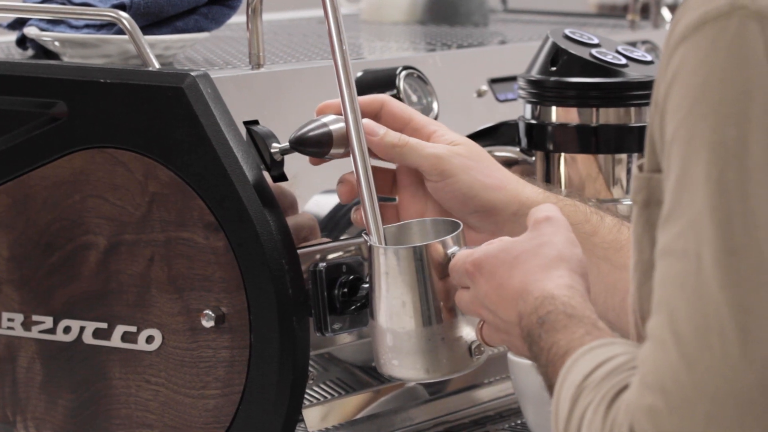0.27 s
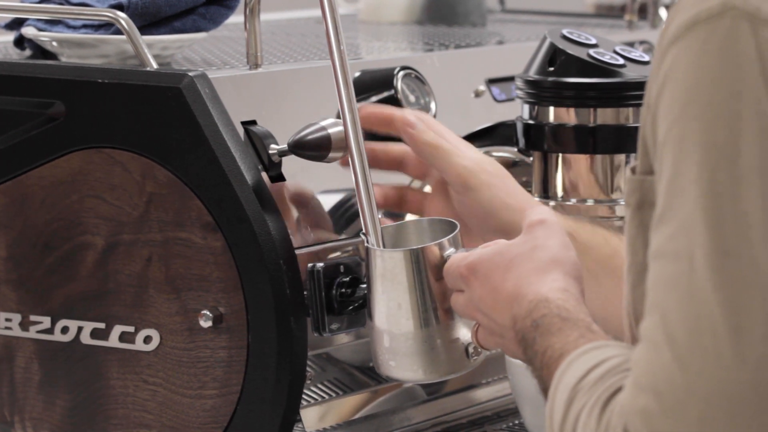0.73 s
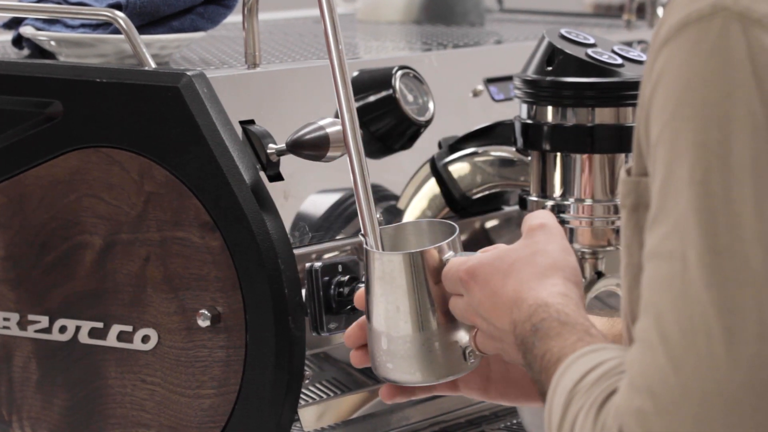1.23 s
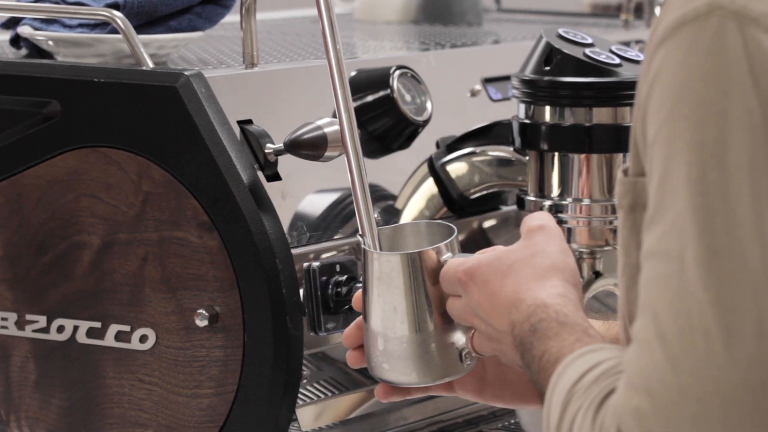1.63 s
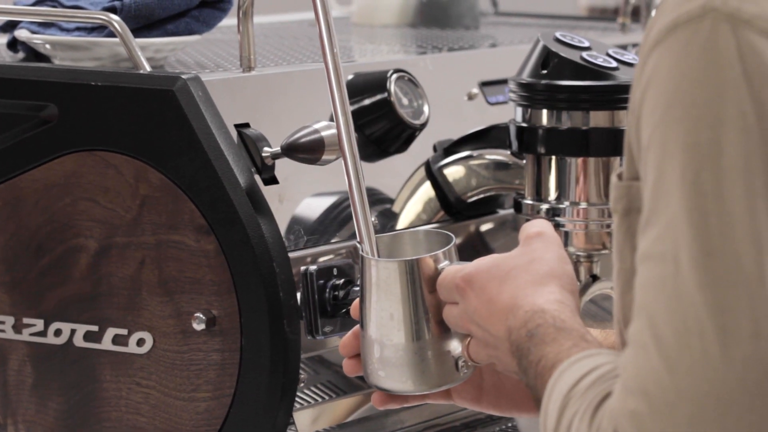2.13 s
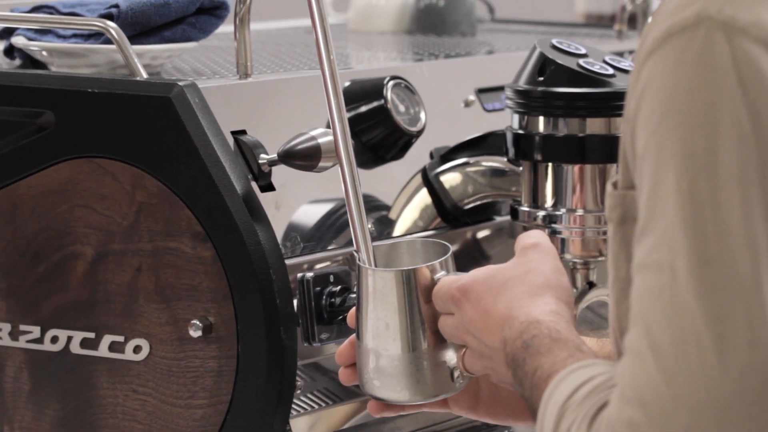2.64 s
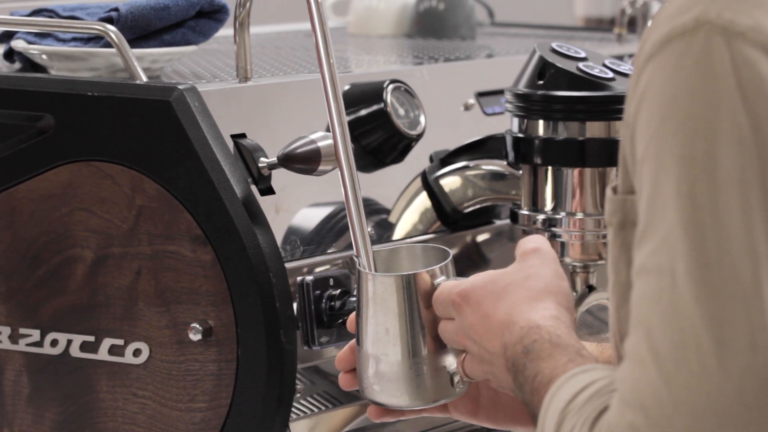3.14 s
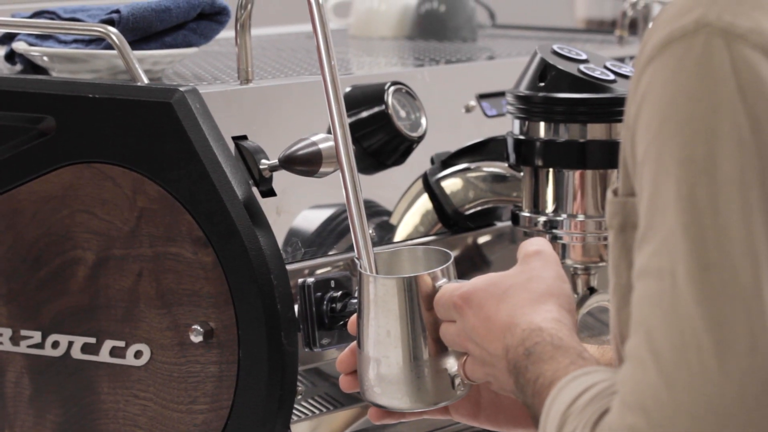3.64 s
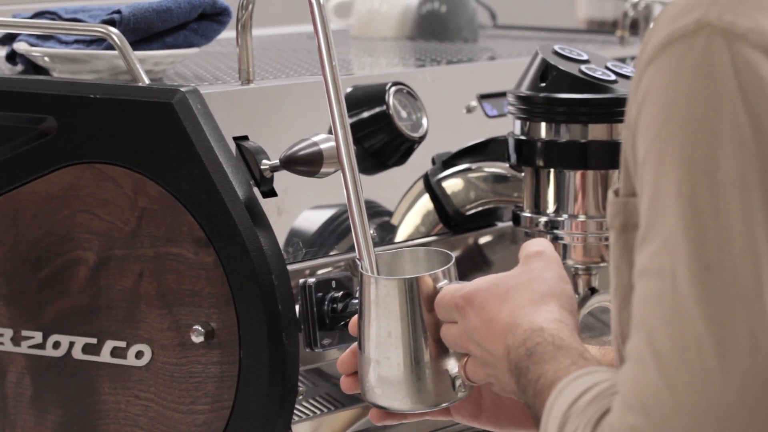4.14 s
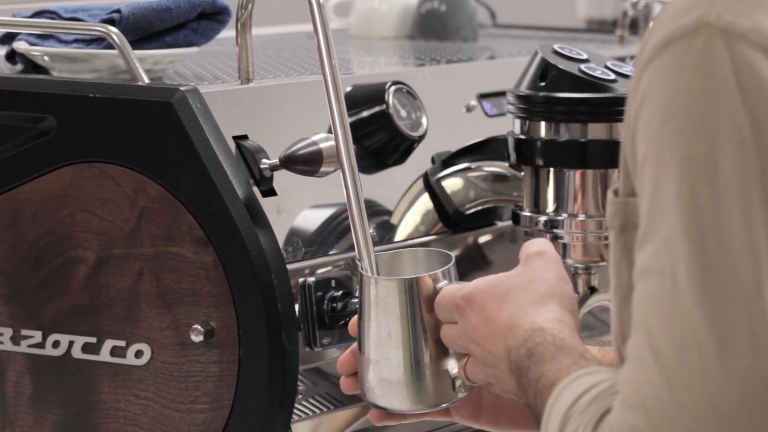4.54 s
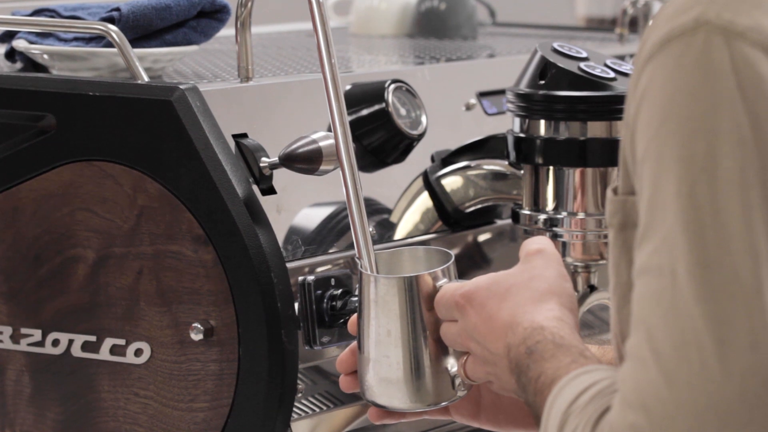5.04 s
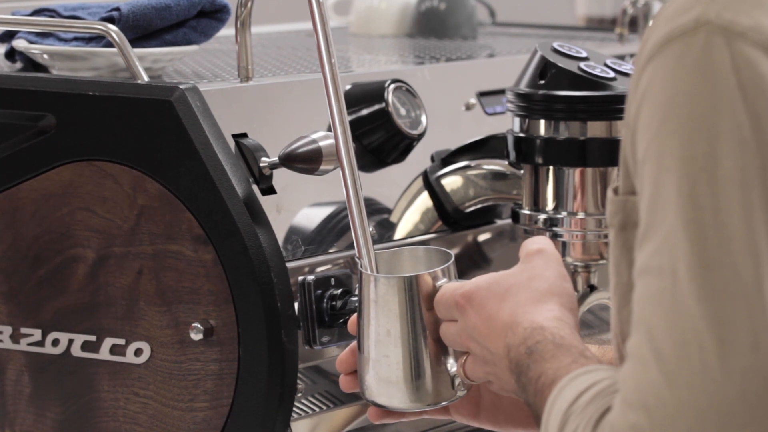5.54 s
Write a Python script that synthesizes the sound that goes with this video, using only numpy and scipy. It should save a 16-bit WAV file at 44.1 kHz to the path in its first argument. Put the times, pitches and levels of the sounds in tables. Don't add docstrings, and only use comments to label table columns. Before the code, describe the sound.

Close view of milk being steamed in a steel pitcher in a quiet room. A loud, shrill metallic screech with roaring steam opens, fades within about a second, then a quieter hollow hiss remains. Small bubbles pop, and from the middle onward bright crackling spits and sputters break through, while the hiss grows duller. Very faint machine rumble lies beneath.

```python
import sys
import numpy as np
from scipy import signal
from scipy.fft import rfft, irfft, next_fast_len
from scipy.io import wavfile
from scipy.ndimage import uniform_filter1d

SR = 44100
rng = np.random.default_rng(int(sys.argv[2]) if len(sys.argv) > 2 else 0)


def nominal_scale(level):
    x = np.asarray(level, float) / 20
    return 10 ** x


def wrap_up_sound(samples):
    columns = np.atleast_2d(samples).T
    tamed = np.clip(columns, -1, 1)
    steps = np.round(tamed * 32767).astype(np.int16)
    wavfile.write(sys.argv[1], SR, steps)


N = 255339
TIME = np.arange(N) / SR
SIZE = next_fast_len(N)
HZ = np.maximum(np.arange(SIZE // 2 + 1) * SR / SIZE, 1)


def rms_one(x):
    return x / np.sqrt(np.mean(x ** 2) + 1e-20)


def in_time(rows):
    s, *columns = np.transpose(rows)
    return [np.interp(TIME, s, column) for column in columns]


def at_hz(points, hz):
    point_hz, point_db = np.transpose(points)
    return np.interp(np.log(hz), np.log(point_hz), point_db)


def drift(rate):
    step = 16
    r = np.exp(-2 * np.pi * step * rate / SR)
    slow = signal.lfilter([1], [1, -2 * r, r * r], rng.standard_normal(N // step + 3002))[3000:]
    return np.interp(np.arange(N) / step, np.arange(len(slow)), rms_one(slow))


def resonance(x, hz, width):
    hz = hz + np.zeros(N)
    out, state = np.zeros(N), np.zeros(2)
    r = np.exp(-np.pi * width / SR)
    b = [(1 - r * r) / 2, 0, (r * r - 1) / 2]
    size = 256 if np.ptp(hz) else N
    for i in range(0, N, size):
        a = [1, -2 * r * np.cos(2 * np.pi * hz[i] / SR), r * r]
        out[i:i + size], state = signal.lfilter(b, a, x[i:i + size], zi=state)
    return out


def mode(x, hz, width):
    return rms_one(resonance(resonance(x, hz, width), hz, 3 * width))


def churn(rough_db, rate):
    return rms_one(rng.standard_normal(N) * nominal_scale(rough_db * drift(rate)))


# (frequency [Hz], width [Hz], lift [dB])
HIGH_AIR = [(6760, 220, 8.5), (8210, 540, 6), (9900, 1630, 4), (7500, 270, 6), (4500, 380, 0.5),
            (12250, 660, 3), (14600, 600, 2.5), (5700, 520, 3.5), (2410, 1200, 7)]


def bands(source, patchy_db, rate):
    lift_db = sum(db / (1 + (2 * (HZ - hz) / width) ** 2) for hz, width, db in HIGH_AIR)
    spectrum = rfft(source, SIZE) * nominal_scale(lift_db)
    for centre in 400 * 2 ** (np.arange(28) / 5):
        band_shape = np.cos(np.pi / 2 * np.clip(5 * np.log2(HZ / centre), -1, 1)) ** 2
        yield centre, irfft(spectrum * band_shape, SIZE)[:N] * nominal_scale(patchy_db * drift(rate))


# (frequency [Hz], density [dB per Hz])
ROOM = [(12, -49), (20, -18.5), (140, -7), (169, -3), (195, -8.5), (260, -5), (447, -15.5), (720, -43),
        (900, -29.5), (1170, -48), (1980, -120)]
# (frequency [Hz], level [dB])
HUM = [(705, -70), (405, -73), (39, -85), (165, -76)]


def room():
    rumble = irfft(rfft(rng.standard_normal(N), SIZE) * nominal_scale(at_hz(ROOM, HZ)), SIZE)[:N]
    tones = sum(nominal_scale(db) * rms_one(resonance(rng.standard_normal(N), hz, 2.1)) for hz, db in HUM)
    return nominal_scale(-68) * rms_one(rumble) + tones


# (time [s], violence [dB], tightness of the jet [rim pitch ratio])
COLLAPSE = [
    (0, 2, 0.5),
    (0.081, 1.5, .63),
    (.14, -1, 0.84),
    (0.229, 1, 0.96),
    (.5, -2.5, 0.99),
    (.82, -4.5, 1.05),
    (.93, -7, .97),
    (.99, -17, .88),
    (1.15, -23, 0.75),
]
# (frequency [Hz], density [dB per Hz])
SCREECH_COLOUR = [(300, -38), (500, -28.5), (800, -10.5), (1000, -34), (1500, 6), (2500, -15), (3300, -9),
                  (4400, 0.5), (5500, -12.5), (6900, -22), (7900, -11), (10500, -11), (12000, -12.5),
                  (16000, -22)]
# (frequency [Hz], width [Hz], level [dB])
WALL = [(988, 38.5, 0), (1245, 29, -8), (428, 48, -28.5), (3050, 61, -29)]
# (frequency [Hz], width [Hz], level [dB])
RIM = [(1823, 28, 1.5), (1970, 26, -2.5), (2150, 50, -2.5), (1687, 60, -7)]
# (frequency [Hz], width [Hz], level [dB])
BRIGHT = [(4840, 450, -4), (7730, 110, -7.5), (8010, 220, -10.5), (9060, 180, -14.5), (6630, 80, -32)]


def screech():
    violence_db, tight = in_time(COLLAPSE)
    tight = np.minimum(tight, 1)
    end_s = COLLAPSE[-1][0]
    t = np.minimum(TIME, end_s)
    alive = t < end_s
    wall_db = -25 + 1.9 * violence_db - 12 * np.clip((t - 0.81) / 0.024, 0, 1)
    rim_db = -23.5 + 1.44 * violence_db + 14.5 * t
    roar_db = -26 + 0.87 * violence_db
    whistle_db = -19.5 + violence_db - 55 * (1 - tight)
    whistle_hz = (3960 - 500 * t) * tight ** 0.49

    shake = churn(2.0, 60)
    wall = sum(nominal_scale(db + 1.5 * drift(25)) * mode(shake, hz, width) for hz, width, db in WALL)
    rim = sum(nominal_scale(db + 1.2 * drift(25)) * mode(shake, hz * tight, width) for hz, width, db in RIM)
    whistle = mode(shake, whistle_hz, 330)
    roar = sum(nominal_scale(at_hz(SCREECH_COLOUR, hz)) * band for hz, band in bands(churn(1.2, 80), 1.3, 50))
    bright = sum(nominal_scale(db) * mode(shake, hz, width) for hz, width, db in BRIGHT)
    steel = nominal_scale(wall_db - 2.5) * wall + nominal_scale(rim_db - 10.0) * rim + nominal_scale(whistle_db - 3.5) * whistle
    broad = nominal_scale(roar_db) * (nominal_scale(0.5) * rms_one(roar) + bright)
    return uniform_filter1d(alive * 1., 4000) * (steel + broad)


# (time [s], air column [Hz], swirl across the pitcher [dB], push down the column [dB])
JET = [(0, 1300, -23, -29.5), (.7, 1196, -45, -42.5), (.95, 1180, -32, -48), (1.1, 1370, -30.5, -39),
       (1.5, 1305, -31.5, -41), (2.1, 1190, -30.5, -43.5), (2.4, 1275, -26, -37.5), (2.55, 1190, -23, -37),
       (2.7, 1090, -27, -45), (2.93, 1110, -30.5, -48), (3.0, 1313, -25.5, -39), (3.5, 1156, -28.5, -36.5),
       (3.9, 1198, -30.5, -36), (4.3, 1254, -35.5, -39.5), (4.6, 1190, -32, -43), (5.1, 1245, -37.5, -38.5),
       (5.45, 1300, -38.5, -39), (5.79, 1360, -38.5, -43)]
# (frequency [Hz], width [Hz], level [dB])
CROSS = [(3037, 150, 16), (3370, 240, 18), (2470, 77, -28), (4320, 1600, 1)]
# (frequency [Hz], density [dB per Hz])
THIN_MILK = [(600, -29), (1000, -20), (1500, -13), (2500, -4), (4000, -1), (5000, -9.5), (5600, -15),
             (6900, -6), (8500, -4.5), (10300, -6.5), (11200, -12), (16000, -16)]
# (frequency [Hz], density [dB per Hz])
THICK_FOAM = [(500, 2), (900, 2), (1600, 13.5), (2500, 8), (4200, 10.5), (4900, 6.5), (5600, 1), (8000, 2),
              (11000, -11), (13500, -18), (16000, -19)]


def jet(opening):
    column_hz, cross_db, column_db = in_time(JET)

    gurgle = 0.012 + 0.14 * np.exp(-TIME)
    wobble_hz = column_hz * (1 + gurgle * drift(9.0))
    depth = np.linspace(0, 1, N) ** 2
    puff = churn(3.13, 44)
    column = (1 - depth) * mode(puff, wobble_hz, 107) + depth * mode(puff, wobble_hz, 386)
    mouth_edge = signal.butter(6, 826, "high", fs=SR, output="sos")
    column = rms_one(signal.sosfilt(mouth_edge, column))

    warm = 1 + 0.11 * np.arange(N) / N
    push, cross = churn(1.7, 45), 0
    for hz, width, db in CROSS:
        moving_hz = hz * warm * (1 + 0.011 * drift(3.0))
        cross = cross + nominal_scale(db + 2.53 * drift(9.7)) * mode(push, moving_hz, width)

    hiss_db = -30.5 - 3 * TIME + 1.17 * drift(7.5)
    foam = np.clip(0.034 + 0.12 * TIME + 0.033 * drift(6.6), 0, 1)
    hiss = 0
    for hz, band in bands(churn(0.83, 41), 3.1, 33):
        thin_db = at_hz(THIN_MILK, hz) - at_hz(THIN_MILK, 10460)
        thick_db = at_hz(THICK_FOAM, hz) - at_hz(THICK_FOAM, 5460)
        hiss = hiss + nominal_scale(thin_db + foam * (thick_db - thin_db)) * band

    column = (nominal_scale(column_db + 2.0) + nominal_scale(-18.0) * opening) * column
    cross = (nominal_scale(cross_db - 3.0) + nominal_scale(-44) * opening) * rms_one(cross)
    return column + cross + nominal_scale(hiss_db + 0.5) * hiss


# (pitch [ratio to the lowest], width [Hz])
MILK_MODES = [(1, 75), (1.84, 118), (2.55, 136)]
# (level [dB], fade [dB per s], kick by a spit [dB])
MILK_LEVELS = [(-49, 4.5, 28.5), (-42.5, 8, 20), (-46, 4.0, 22)]


def milk(opening):
    lowest_hz = np.clip(1240 - 230 * TIME, 240, 950)
    stir, jolt, out = churn(2.2, 28), uniform_filter1d(opening, 600), 0
    for (ratio, width), (level_db, fade, kick_db) in zip(MILK_MODES, MILK_LEVELS):
        hz = ratio * lowest_hz * (1 + 0.025 * drift(12))
        lift_db = 16 / (1 + (2 * (hz - 1604) / 400) ** 2)
        sway_db = 0.47 * drift(5) + 2.0 * drift(5.0)
        wave = nominal_scale(level_db - fade * TIME + lift_db + sway_db) * mode(stir, hz, width)
        out = out + (1 + nominal_scale(kick_db) * jolt) * wave
    heave = rms_one(uniform_filter1d(opening, 900)) * mode(churn(0.97, 32), 217, 246)
    heave_db = -55 - 24 + 2 * TIME
    return out + nominal_scale(heave_db) * heave


# (middle [s], length [s], pitch [Hz], peak [dB])
BUBBLES = [(.072, .013, 1275, -23), (.322, 0.0028, 3900, -13), (.511, 0.019, 990, -24.5),
           (.746, .018, 1813, -18), (.806, 0.011, 3490, -17), (.808, .01, 1800, -18),
           (.89, 0.014, 3050, -23.5), (.928, .0085, 1694, -17.5), (1.254, .0074, 3540, -25.5),
           (1.264, 0.01, 1910, -23.5), (1.502, 0.014, 1580, -30.5), (1.615, 0.0037, 2960, -24),
           (1.664, .0031, 2850, -22.5), (1.683, 0.0053, 1200, -24), (1.828, .0038, 3500, -25.5),
           (2.5, 0.018, 3510, -16), (2.541, 0.016, 3710, -18.5), (2.644, 0.0036, 3510, -15.5),
           (3.027, 0.012, 3120, -25), (3.588, .0037, 3650, -21.5), (3.631, 0.0062, 1200, -21),
           (3.679, 0.0078, 1030, -26), (3.73, 0.0034, 1165, -16), (3.761, 0.0079, 3240, -24),
           (4.32, .012, 1244, -29), (1.678, .0015, 5700, -19.5), (4.678, 0.0051, 1200, -27),
           (4.695, .008, 3740, -26.5), (5.297, 0.0087, 1200, -28), (5.299, 0.03, 3840, -27.5)]
# (middle [s], pitch [Hz], peak [dB])
GULPS = [(2.71, 585, -41.5), (2.879, 546, -56), (3.217, 507, -50), (3.413, 457, -52), (3.598, 870, -33),
         (3.686, 780, -38.5), (3.85, 910, -35), (4.024, 272, -50), (4.49, 684, -50), (2.766, 570, -53),
         (4.322, 667, -41.5), (4.62, 630, -46), (4.696, 595, -39.5), (4.839, 700, -42), (5.051, 550, -47),
         (5.296, 242, -44), (5.309, 713, -40.5), (5.53, 504, -47)]


def bubbles():
    gulp_s, plop_s = 0.016, 0.0029
    rows = BUBBLES + [(s, gulp_s, hz, level_db) for s, hz, level_db in GULPS]
    rows += [(s - gulp_s / 2, plop_s, 1.19 * hz, level_db - 3) for s, hz, level_db in GULPS]
    out = np.zeros(N)
    for (s, length, hz, level_db), start in zip(rows, rng.random((len(rows), 1))):
        reach = round(2 * length * SR)
        t = np.arange(-reach, reach) / SR
        at = np.clip(round(s * SR) + np.arange(len(t)) - len(t) // 2, 0, N - 1)
        turns = hz * t * (1 + 0.014 * t / length) + start
        swell = np.exp(-2.6 * (t / length) ** 2)
        out[at] += nominal_scale(level_db + 2.0) * swell * np.sin(2 * np.pi * turns)
    return out


# (time [s], length [s], level [dB], swell [dB])
SPITS = [(1.659, 0.029, -27, 1.5), (1.729, .006, -21, 1), (1.751, 0.0051, -26, 9), (1.816, 0.012, -30, -14),
         (2.665, 0.0044, -22, 9), (2.687, 0.019, -23, 3), (2.7, 0.009, -17.5, 11),
         (2.756, 0.018, -19.5, -12), (2.854, 0.025, -15.5, 6.5), (2.997, 0.0076, -33, -7),
         (3.187, 0.03, -27.5, -10), (3.214, 0.0075, -30, 0), (3.372, .014, -22, 3),
         (3.499, 0.024, -24.5, -2), (3.523, 0.021, -31, 4), (4.171, 0.026, -29, -14),
         (4.211, 0.025, -35, -3), (4.25, 0.021, -25.5, -6), (4.464, 0.0081, -29.5, -7),
         (4.486, 0.046, -30.5, 8), (4.567, 0.013, -33.5, -10), (4.603, 0.017, -26.5, 1),
         (4.638, 0.016, -24.5, -6), (4.95, 0.019, -30.5, 1), (5.005, 0.02, -34.5, -7),
         (5.036, 0.022, -26, -9), (5.151, 0.032, -20.5, 0), (5.355, 0.015, -34, -17),
         (5.373, .012, -33.5, -19), (5.695, 0.022, -34.5, -12)]
# (time [s], length [s], peak [dB], place of the peak [0-1])
SPUTTERS = [(3.398, 0.021, -16, 0.6), (3.422, 0.016, -14.5, 0.87), (3.576, 0.03, -17, 0.66),
            (3.614, .088, -21, 0.76), (3.719, 0.058, -20.5, 0.37), (3.818, 0.014, -20, 0.7),
            (3.834, 0.017, -14, 0.55), (3.866, 0.043, -23.5, 0.6), (3.915, 0.044, -22.5, 0),
            (3.985, 0.069, -19.5, 0.84), (4.661, 0.043, -16.5, 0.59), (4.714, 0.017, -18, 0.5),
            (4.765, 0.097, -21.5, .65), (4.878, 0.039, -20.5, 0.3), (5.21, 0.03, -30.5, .4),
            (5.24, 0.033, -21.5, 0.4), (5.273, 0.061, -17, 0.27), (5.336, 0.017, -29, 0.3)]


def tip():
    open_db = np.full(N, -120.)
    flutter_db = -1 * drift(32)
    for s, length, level_db, swell_db in SPITS:
        span = slice(round(s * SR), round((s + length) * SR))
        along = np.linspace(-.5, .5, len(open_db[span]))
        arch_db = 3.5 * (1 / 3 - 4 * along ** 2)
        open_db[span] = level_db + swell_db * along + arch_db
    for s, length, level_db, place in SPUTTERS:
        span = slice(round(s * SR), round((s + length) * SR))
        along = np.linspace(0, 1, len(open_db[span]))
        place = np.clip(place, .05, .95)
        away = abs(along - place) / max(place, 1 - place)
        open_db[span] = level_db - 9 * away + flutter_db[span]
    top_db = -17.5 - 0.49 * (np.maximum(open_db, -36) + 30) + 1.88 * TIME
    r = np.exp(-1 / (.001 * SR))
    return signal.lfilter([1 - r], [1, -r], nominal_scale(open_db)), uniform_filter1d(top_db, size=400)


# (frequency [Hz], density [dB per Hz])
SPIT_COLOUR = [(240, -67), (400, -45), (570, -11.5), (800, -14.5), (1220, -12.5), (2300, -73), (3750, 3),
               (5000, -9), (6100, -7.5), (7300, -2), (9900, -0.5), (11000, -2), (13200, -8.5),
               (16000, -1.5)]


def linger(opening, seconds):
    r = np.exp(-1 / (seconds * SR))
    return np.sqrt(signal.lfilter([1 - r], [1, -r], opening ** 2))


def spits(opening, top_db):
    air = 0
    for hz, band in bands(churn(2.03, 320), 3.8, 82):
        narrow_db = (top_db + 9) * np.clip(2.4 * abs(np.log2(hz / 8900)), 0, 1.2)
        air = air + nominal_scale(at_hz(SPIT_COLOUR, hz) + narrow_db) * band
    ring = nominal_scale(-13) * linger(opening, 0.015) * np.roll(air, 5000)
    fizz = nominal_scale(-28.5) * linger(opening, 0.08) * np.roll(air, 9000)
    return nominal_scale(1.5) * opening * air + fizz + ring


def scene():
    opening, top_db = tip()
    surface = spits(opening, top_db) + bubbles()
    return (screech() + jet(opening) + milk(opening) + surface + room())[None]


def top_cut(x):
    return signal.sosfilt(signal.butter(12, 16660, fs=SR, output="sos"), x)


def record(dry):
    steep_cut = signal.ellip(10, .5, 45, 15780, fs=SR, output="sos")
    mix = signal.sosfilt(steep_cut, dry)
    return top_cut(mix)


dry = scene()
out = record(dry)
wrap_up_sound(out)
```